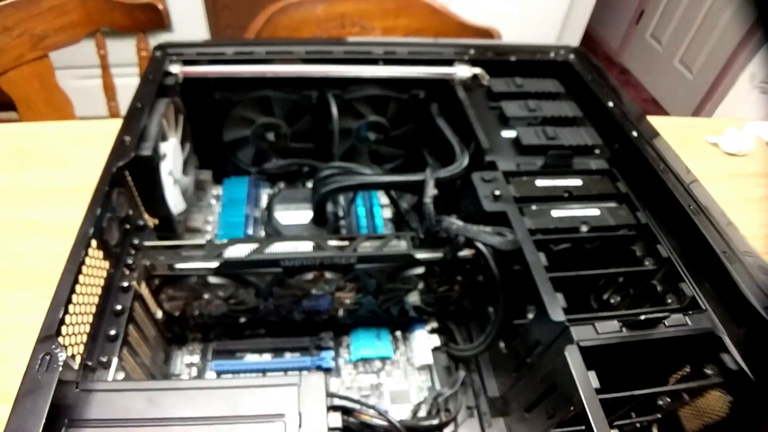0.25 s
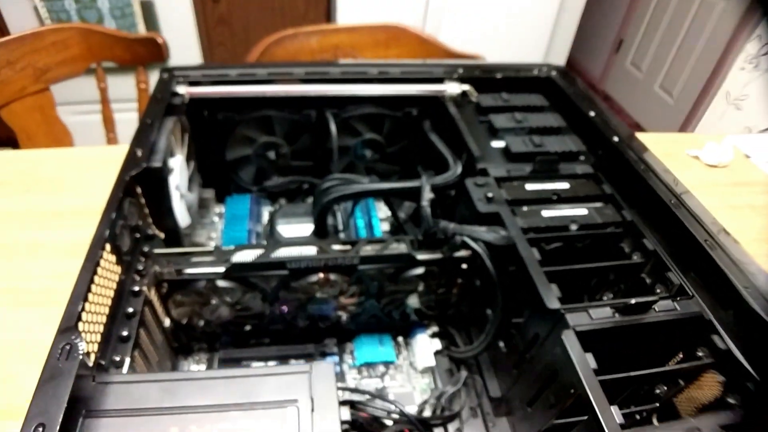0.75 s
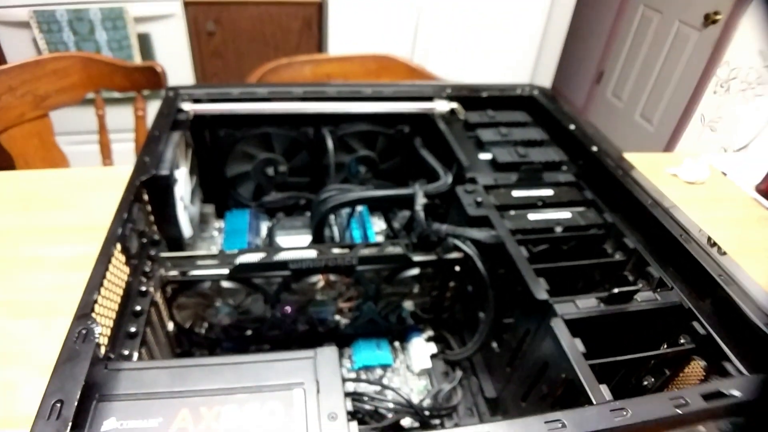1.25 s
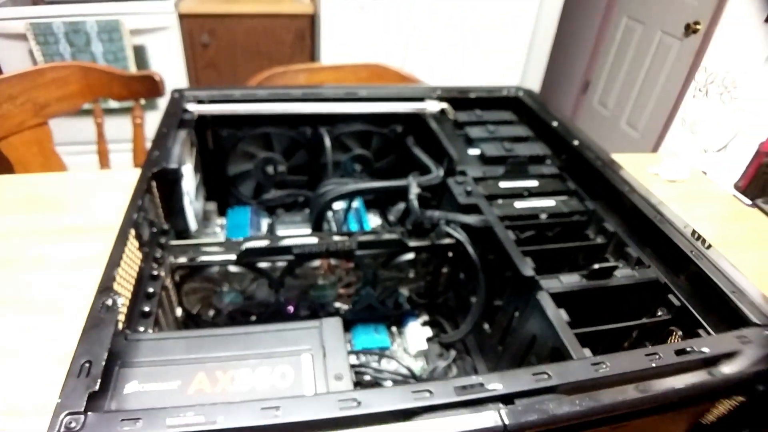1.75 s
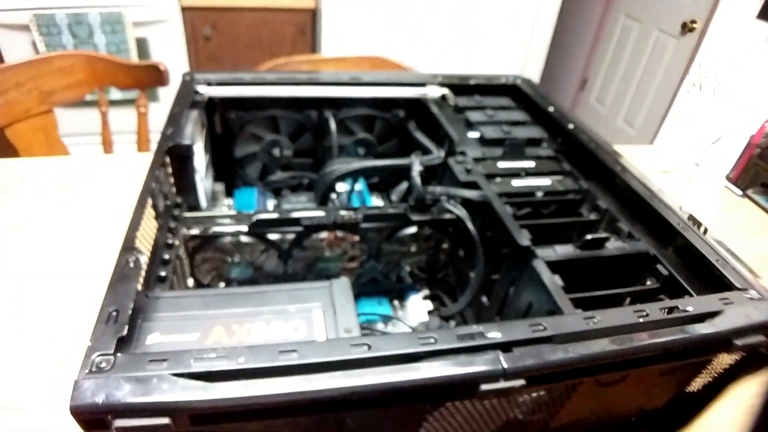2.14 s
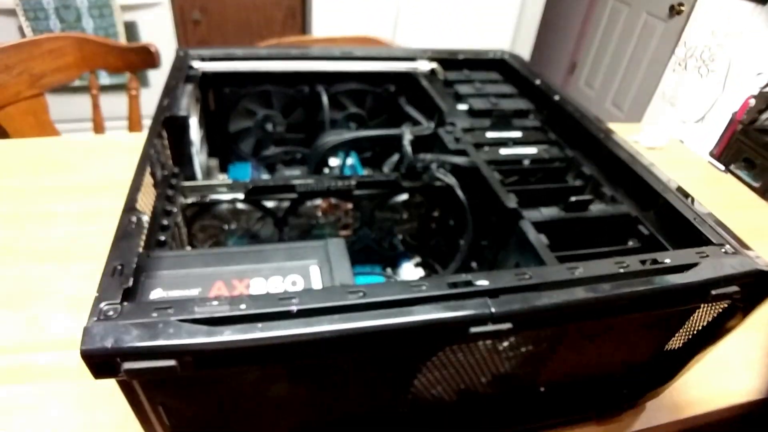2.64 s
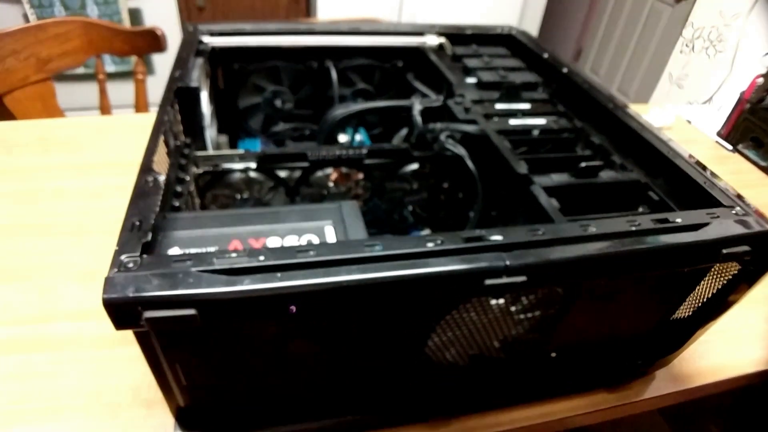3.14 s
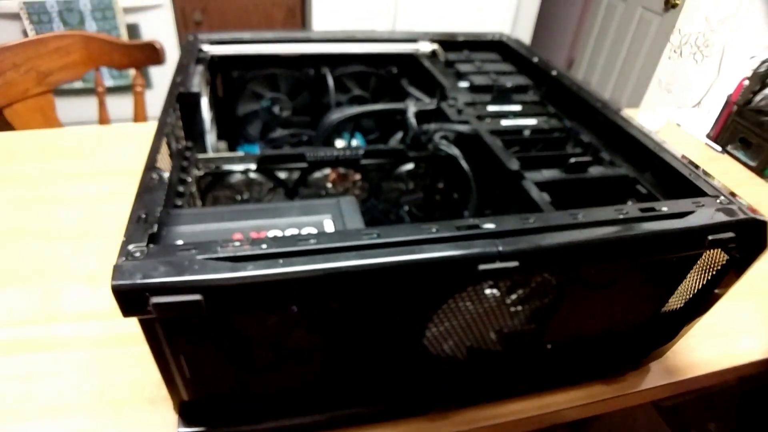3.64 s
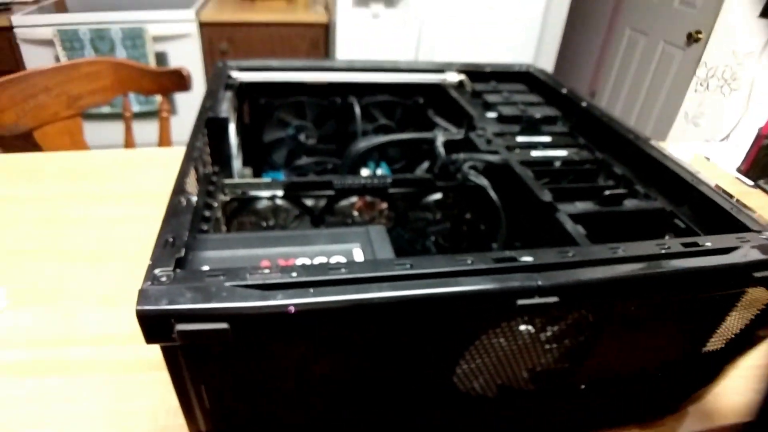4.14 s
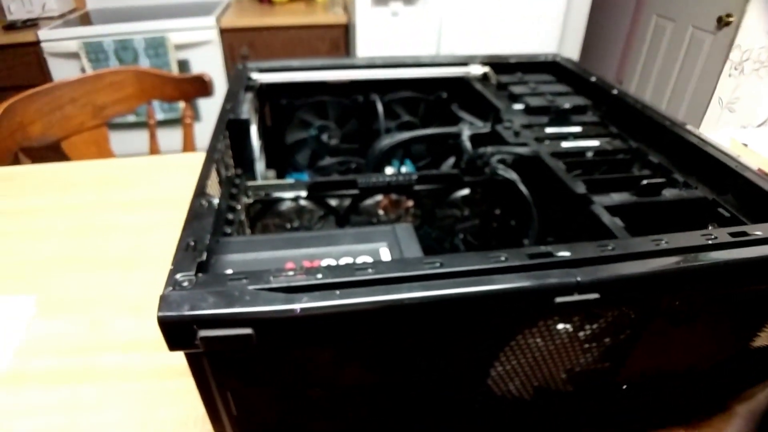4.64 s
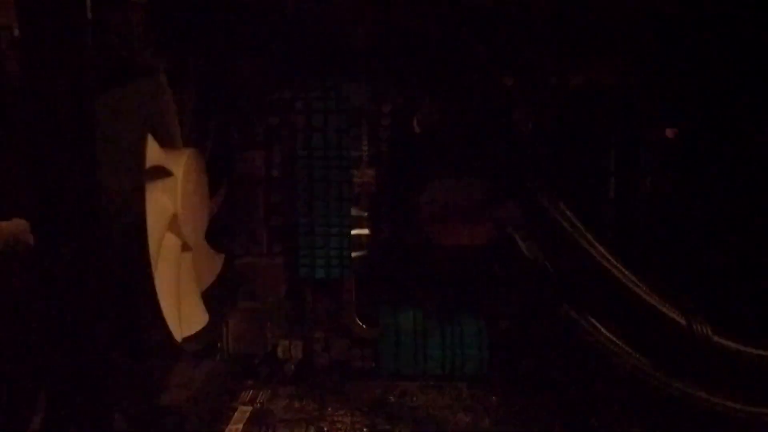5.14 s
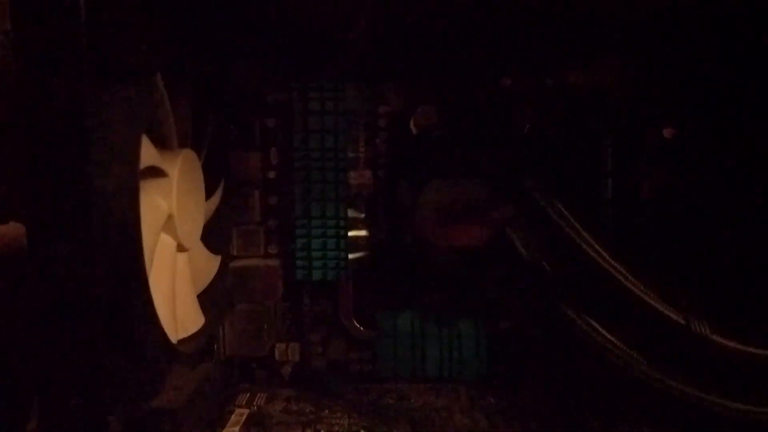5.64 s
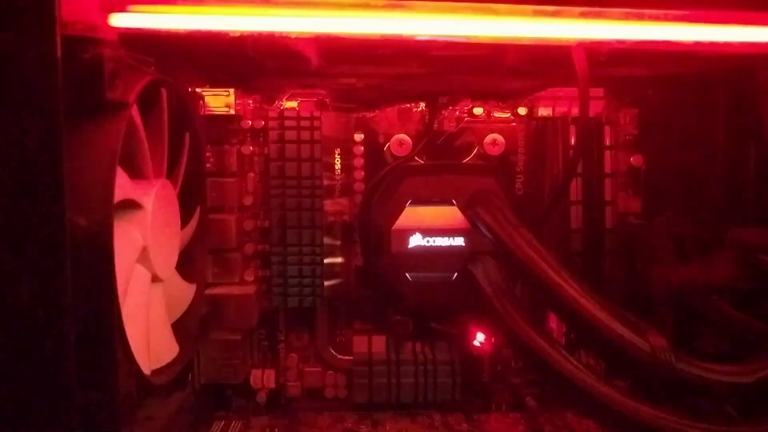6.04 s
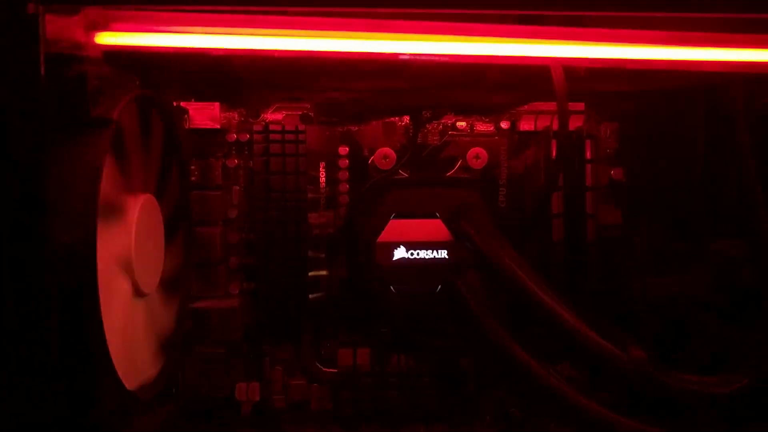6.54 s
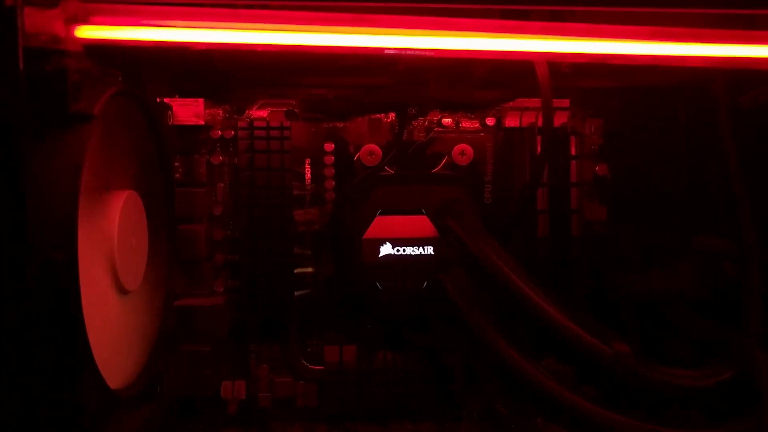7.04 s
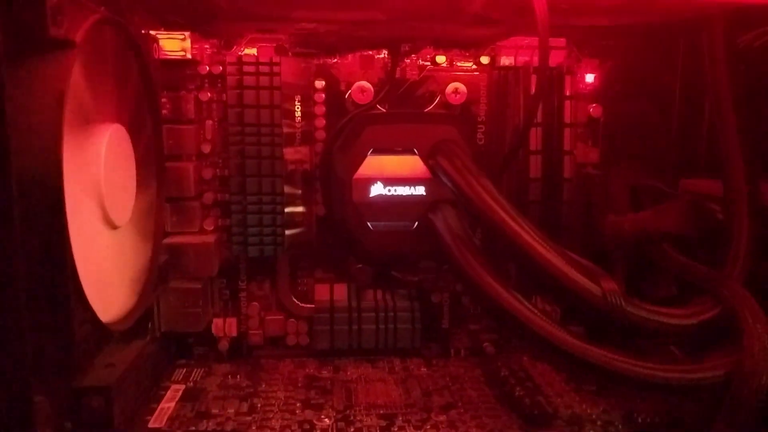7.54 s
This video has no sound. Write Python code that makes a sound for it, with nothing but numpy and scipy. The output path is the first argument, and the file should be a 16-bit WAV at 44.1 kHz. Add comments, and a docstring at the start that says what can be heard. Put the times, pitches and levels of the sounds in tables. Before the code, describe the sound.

Low computer hum with handling bumps and rubs, a faint electronic whine, a switch click and fans gathering speed.

```python
"""An open computer starts up

A desktop computer hums and blows air, while a hand thumps and rubs the phone that listens to it.
At 4.75 s the sound jumps to inside the case, where the electronic coils whine.
A power switch clicks down and up, and the fans gather speed.
Near the end the bass drops away and leaves a thin whine."""
import sys
import numpy as np
from scipy import signal
from scipy.fft import rfft, irfft, next_fast_len
from scipy.io import wavfile
from scipy.ndimage import uniform_filter1d

SR = 44100
rng = np.random.default_rng(int(sys.argv[2]) if len(sys.argv) > 2 else 0)


def waveform_to_disk(signal):
    """Save audio, clipped to [-1, 1], as 16-bit WAV at the path in sys.argv[1]."""
    frames = np.transpose(np.atleast_2d(signal))
    scaled = np.clip(frames, -1, 1) * 32767
    samples = np.round(scaled).astype(np.int16)
    wavfile.write(sys.argv[1], SR, samples)


N = 343098
T = np.arange(N) / SR


def undb(db):
    """Turn decibels into a number to multiply a sound by."""
    return 10 ** (np.asarray(db) / 20)


def wander(rate):
    """A smooth random drift of about 1 either way, with `rate` new values a second."""
    steps = np.arange(int(N / SR * rate) + 2)
    path = np.interp(T * rate, steps, rng.standard_normal(len(steps)))
    return 1.293 * uniform_filter1d(path, max(int(SR / rate), 2))


def noise(gain, size=N):
    """Noise of average (rms) strength 1; gain(f) sets the share of each frequency."""
    n = next_fast_len(size)
    hz = np.maximum(np.arange(n // 2 + 1) * SR / n, 1)
    x = irfft(rfft(rng.standard_normal(n)) * gain(hz), n)[:size]
    return x / x.std()


def coloured(points, size=N):
    """Noise whose colour, its balance of low and high, follows (f/Hz, level/dB) points."""
    hz, db = np.transpose(points)
    return noise(lambda f: undb(np.interp(np.log(f), np.log(hz), db)), size)


def ringing_noise(hz, width, size=N):
    """Noise gathered around one pitch."""
    return noise(lambda f: 1 / (1 + 2 * ((f * f - hz * hz) / (2 * f * width)) ** 2), size)


def tone(hz):
    """A pure tone of average (rms) strength 1 on a moving pitch."""
    return np.sqrt(2) * np.sin(2 * np.pi * (np.cumsum(hz) / SR + rng.random()))


def swell(t, rise, decay):
    """Grow softly up to t = 0, then die away."""
    return np.exp(-(np.minimum(t, 0) / rise) ** 2 - np.maximum(t, 0) / decay)


def fade_in(at_s, length_s):
    """A straight fade from 0 to 1, halfway at at_s."""
    return np.clip((T - at_s) / length_s + .5, 0, 1)


def add(out, s, x):
    """Mix x into out, starting at s seconds."""
    i = int(s * SR)
    out[i:i + len(x)] += x[:N - i]


# Colour of the moving air, outside and inside the case: f/Hz, level/dB
AIR_OUTSIDE = [(150, -15.5), (300, -7), (430, -6.5), (520, -11.5), (690, -17.5), (830, -11), (1020, -13.5),
               (1190, -10.5), (1850, -13), (3200, -20), (4100, -20.5), (6500, -26), (11600, -24),
               (15500, -29.5)]
AIR_INSIDE = [(150, 4), (280, -0.5), (440, -4), (610, -2), (740, -7.5), (950, -7), (1200, -6), (1450, -9),
              (1800, -5.5), (2800, -12.5), (4500, -13.5), (7000, -17.5), (11000, -19.5), (15500, -23)]
def air(inside):
    """Moving air makes a soft, slightly wavering rush."""
    outer = coloured(AIR_OUTSIDE) * undb(-62 + .5 * wander(3.94))
    inner = coloured(AIR_INSIDE) * undb(-57 + .5 * wander(3.98))
    return (1 - inside) * outer + inside * inner


# Colour of the hand's rumble: f/Hz, level/dB
RUMBLE_COLOUR = [(5, -16), (10, 12), (18, -14), (26, 10), (32, -2), (40, -12), (65, -8.5), (88, -15),
                 (135, -12.5), (175, -27.5), (280, -32), (500, -59)]
def hand_rumble():
    """The held phone rumbles, less and less as the hand settles."""
    settle_db_per_s = 1.15
    return coloured(RUMBLE_COLOUR) * undb(-39.5 - settle_db_per_s * T + .6 * wander(3))


# Tones of the hum: f/Hz, level outside/dB, level inside/dB, waver/dB
HUM_TONES = [(122.3, -44.5, -44.5, 1), (175, -88, -70, 2.5), (200.5, -61, -60.5, 1.2),
             (239.9, -66, -88, 3.1), (318, -72.5, -79, 0.5), (359.4, -71.5, -84.5, 2.2),
             (400.8, -71.5, -81.5, 1.5), (1363, -80, -77, 2.5), (1754, -88, -77, 0), (2140, -87, -103, 2),
             (2756, -84, -96, 0.5)]
def hum(inside):
    """Motors and mains power hum; the higher tones waver more in pitch."""
    out = np.zeros(N)
    for hz, out_db, in_db, waver_db in HUM_TONES:
        line = tone(hz + (.36 + hz / 350) * wander(14))
        out += line * undb(out_db + (in_db - out_db) * inside + waver_db * wander(9))
    return out


# Tiny squeaks of the grip: t/s, level/dB
GRIP_SQUEAKS = [(2.5546, -48.5), (2.716, -46.5), (2.788, -47), (2.917, -52)]
def squeaks():
    """Skin slips and tightens: a knock, then a tiny rising chirp."""
    out, t = np.zeros(N), np.arange(SR // 10) / SR
    rising_hz = 4250 - 2400 * np.exp(-t / .0024)
    knock = undb(-2.5) * np.exp(-t / .0032) * np.sin(2 * np.pi * 820 * t)
    for s, db in GRIP_SQUEAKS:
        shaky_hz = rising_hz * (1 + .058 * ringing_noise(400, 600, len(t)))
        chirp = np.sin(2 * np.pi * np.cumsum(shaky_hz) / SR)
        add(out, s, undb(db) * (swell(t - .002, rise=.0023, decay=.003) * chirp + knock))
    return out


# Colour of a rub heard through the phone's shell: f/Hz, level/dB
SHELL_COLOUR = [(300, 15), (800, -8), (2500, 6), (4000, 3), (6000, 3.5), (7000, 6.5), (8200, 1.5),
                (9800, 2), (12000, -2), (15500, -5.5)]
# Finger rubs: peak t/s, decay/s, scrape level/dB, scrape f/Hz, half width/Hz, hiss level/dB
FINGER_RUBS = [(.922, 0.024, -53, 600, 1110, -56), (1.636, .0025, -48, 9700, 1000, -45.5),
               (1.645, .0018, -47, 3900, 800, -43), (1.652, 0.028, -56.5, 1230, 130, -49),
               (1.888, 0.025, -64, 7000, 600, -55), (2.024, .007, -60, 3700, 1100, -78),
               (2.065, .004, -60, 3260, 1100, -78), (2.254, .0012, -57, 9000, 5000, -56),
               (3.896, 0.0068, -41, 1400, 1300, -50.5), (3.913, .014, -44, 1550, 1200, -53),
               (3.933, .008, -48, 1450, 1200, -54.5), (5.012, 0.0067, -53, 1500, 1600, -51),
               (5.254, .004, -52.5, 2000, 2000, -51.5), (5.9, 0.014, -55, 1790, 1500, -67),
               (6.575, .012, -59, 2500, 2400, -52), (6.594, 0.028, -50.5, 750, 1100, -64)]
def rubs():
    """Skin sticks and slips on the shell: a scrape with a thin hiss on top."""
    lead_s = .1  # room to swell before the peak
    out, t = np.zeros(N), np.arange(SR // 2) / SR - lead_s
    for s, decay, scrape_db, hz, width, hiss_db in FINGER_RUBS:
        scrape = noise(lambda f: 1 / (1 + 2 * ((f - hz) / width) ** 4) * f / (f + 200), len(t))
        slips = undb(1.7 * ringing_noise(140, 200, len(t)) - 1.9)
        contact = swell(t, .84 * decay, decay) * slips
        hiss = coloured(SHELL_COLOUR, len(t))
        add(out, s - lead_s, contact * (undb(scrape_db) * scrape + undb(hiss_db) * hiss))
    return out


# Sharp taps on the phone and the case: t/s, f/Hz, level/dB
SHELL_TAPS = [(.903, 800, -37.5), (3.8829, 444, -28.5), (3.8917, 1320, -20), (5.0065, 510, -30.5),
              (5.0117, 338, -27.5), (6.571, 487, -21.5), (6.5732, 184, -24.5)]
def taps():
    """A quick push makes the shell swing once or twice."""
    out, t = np.zeros(N), np.arange(SR // 10) / SR
    decay_cycles = .64
    attack = (1 - np.exp(-t / .00009)) ** 2
    for s, hz, db in SHELL_TAPS:
        swing = np.exp(-t * hz / decay_cycles) * np.cos(2 * np.pi * hz * t - .6)
        add(out, s, undb(db) * attack * swing)
    return out


# Colour of the rumble after a thump: f/Hz, level/dB
THUD_COLOUR = [(12, -2), (25, 6.5), (55, 4.5), (100, -1.5), (170, -7.5), (230, -35), (500, -44.5),
               (2000, -83)]
# Soft thumps through the phone: peak t/s, f/Hz, push level/dB, rumble level/dB
GRIP_THUMPS = [(1.507, 95.6, -18.5, -28.5), (1.663, 116, -12.5, -25.5), (1.823, 116, -30, -51),
               (1.898, 115.6, -17, -30), (2.236, 83, -24, -39), (2.275, 109, -15, -32),
               (2.546, 24, -28, -42), (2.988, 113, -20, -27), (3.771, 60.4, -32, -44), (4.37, 52, -25, -35),
               (4.511, 27, -32.5, -46), (5.281, 58.3, -24, -34.5), (5.322, 69, -29.5, -45),
               (7.143, 53.5, -28, -50)]
def thumps():
    """A shifting grip rocks the phone and leaves a short rumble; lower thumps are slower."""
    lead_s = .1
    out, t = np.zeros(N), np.arange(SR // 2) / SR - lead_s
    for s, hz, push_db, rumble_db in GRIP_THUMPS:
        push = swell(t, rise=1 / hz, decay=1.36 / hz) * np.cos(2 * np.pi * hz * t)
        rumble = swell(t - .012, rise=.019, decay=.045) * coloured(THUD_COLOUR, len(t))
        add(out, s - lead_s, undb(push_db) * push + undb(rumble_db) * rumble)
    return out


# Thin tones of the coils: f/Hz, level/dB
COIL_TONES = [(3268.5, -69), (3815, -89), (5506, -78), (6535, -83), (7289, -95), (7391, -90), (7490, -90),
              (8126, -86), (8230, -81.5), (8543, -82), (8867, -75.5), (9507, -96), (9609, -97),
              (10245, -82)]
# Bands where the coils sizzle: f/Hz, width/Hz, level/dB, change during the surge/dB
SIZZLE_BANDS = [(3166, 330, -73, 2), (3780, 680, -71, -5.5), (5610, 1000, -72.5, 5), (8260, 2150, -70.5, 1),
                (10100, 1200, -80.5, 4)]
def coils():
    """Coils whine and sizzle with their electrical load: a surge, then standby, then easy running."""
    surge = 1 - fade_in(at_s=5.04, length_s=.05)
    running = fade_in(at_s=6.6, length_s=.18)
    standby = 1 - surge - running
    load_db = 7.5 * surge + 3 * standby - 1.5 * running
    loudest_db = max(db for _, db in COIL_TONES)
    whine, sizzle = np.zeros(N), np.zeros(N)
    for hz, db in COIL_TONES:
        share = 1 if db == loudest_db else .25  # weaker tones follow the load less
        whine += tone(hz + 2.4 * wander(60)) * undb(db + share * load_db + 1.5 * wander(15))
    # Random peaks make the noise sound like a crowd of faint switching tones.
    peak_hz = np.arange(0, SR / 2, 30)
    peaks = undb(4.7 * rng.standard_normal(len(peak_hz)))
    for hz, width, db, surge_db in SIZZLE_BANDS:
        band = noise(lambda f: np.interp(f, peak_hz, peaks) / (1 + (2 * (f - hz) / width) ** 6))
        sizzle += band * undb(db + surge * surge_db)
    return whine + sizzle * undb(.2 * load_db)


# Very high tones of the power supply: f/Hz, level/dB
SUPPLY_TONES = [(13485, -90), (14115, -83), (14734, -79), (15353, -75)]
def supply_squeal():
    """The power supply squeals briefly as it takes the load."""
    squeal = sum(tone(hz + 20 * wander(200)) * undb(db) for hz, db in SUPPLY_TONES)
    sounding = fade_in(at_s=6.55, length_s=.02) - fade_in(at_s=6.73, length_s=.02)
    return undb(-2) * squeal * sounding


# Colour of the switch's snap: f/Hz, level/dB
SNAP_COLOUR = [(500, -3), (2000, -10), (4000, -2), (6500, -4), (9000, -8), (12000, -0.5), (15000, 2)]
# Pitches at which the front panel rings: f/Hz, width/Hz, level/dB
PANEL_RINGS = [(750, 1500, -9.5), (1550, 530, -6.5), (2320, 220, -8.5), (2780, 280, -6.5), (3700, 670, -7)]
# The switch pressed and let go: t/s, snap level/dB, snap decay/s, spring level/dB, panel level/dB
SWITCH_CLICKS = [(5.9847, -33.5, 0.0032, -37, -51.5), (6.0711, -42, 0.0029, -46, -59),
                 (6.0878, -34.5, 0.0061, -52, -41)]
def power_switch():
    """The switch snaps, its spring rings, and the front panel gives a duller answer."""
    out, t = np.zeros(N), np.arange(SR // 4) / SR
    spring_hz, panel_delay_s = 5150, .017
    spring = np.sqrt(2) * np.sin(2 * np.pi * spring_hz * t) * np.exp(-t / .0043)
    snap_tail = undb(-19) * np.exp(-t / .025)
    answer = swell(t - panel_delay_s, rise=.016, decay=.014)
    for s, snap_db, decay, spring_db, panel_db in SWITCH_CLICKS:
        snap = coloured(SNAP_COLOUR, len(t)) * (np.exp(-t / decay) + snap_tail)
        panel = sum(ringing_noise(hz, width, len(t)) * undb(db) for hz, width, db in PANEL_RINGS)
        add(out, s, undb(snap_db) * snap + undb(spring_db) * spring + undb(panel_db) * panel * answer)
    return out


def run_up(start_s, lag_s):
    """A motor's share of full speed: it climbs quickly at first, then levels off."""
    return np.maximum(1 - np.exp(-np.maximum(T - start_s, 0) / lag_s), 1e-3)


def small_fan():
    """A small, fast fan's motor sings faint rising tones, loudest while it pulls hardest."""
    full_speed_hz, frame_hz = 1250, 5000
    motor_hz = full_speed_hz * run_up(start_s=6.76, lag_s=.52)
    song = np.zeros(N)
    for multiple in range(6, 19):
        hz = multiple * motor_hz
        flare = 1 + undb(5) / (1 + ((hz - frame_hz) / 450) ** 2)  # louder where the fan's frame rings
        song += tone(hz) * flare
    pull = swell(T - 7.41, rise=.13, decay=.22)
    return undb(-80) * song * pull


# Pitches at which the case rings: f/Hz, width/Hz, level/dB
CASE_RINGS = [(205, 67, -2), (326, 60, -2.5), (615, 43, 0), (905, 110, 0.5), (1200, 200, 1),
              (1600, 110, -3), (1760, 70, -2)]
def case_gain(hz):
    """The open case passes a tone best near its own ringing pitches."""
    return undb(-20) + sum(undb(db) / (1 + (2 * (hz - f) / width) ** 2) for f, width, db in CASE_RINGS)


# Tones of the fan blades: multiple of the rate at which blades pass, level/dB
FAN_TONES = [(1, -50), (2, -68), (4, -72), (5, -72), (6, -74), (7, -67.5), (9, -66.5), (11, -70)]
# Colour of the air the fans push: f/Hz, level/dB
RUSH_COLOUR = [(70, -12.5), (170, 10.5), (300, -1.5), (600, -8.5), (1200, -21), (2500, -25), (6000, -27),
               (12000, -29), (15300, -23)]
def fans():
    """Blades chop the air into rising tones and a rush, both growing louder with speed."""
    full_speed_hz, db_per_tenfold_speed = 205.5, 46
    speed = run_up(start_s=6.292, lag_s=.68)
    blades = np.zeros(N)
    for multiple, db in FAN_TONES:
        hz = multiple * full_speed_hz * speed
        blades += tone(hz * (1 + .004 * wander(70))) * case_gain(hz) * undb(db + 2.2 * wander(16))
    rush = coloured(RUSH_COLOUR) * undb(-56.5 + 1.1 * wander(7.8))
    return (blades + rush) * undb(2.5 + db_per_tenfold_speed * np.log10(speed))


def scene():
    """Mix everything into one channel; the coils and starting fans are heard only inside the case."""
    inside = fade_in(at_s=4.749, length_s=.018)  # 0 outside the case, 1 inside
    background = hum(inside) + air(inside) + hand_rumble()
    machine = coils() + supply_squeal() + fans() + small_fan()
    handling = thumps() + taps() + rubs() + squeaks()
    return (background + inside * machine + handling + power_switch())[None]


def record(dry):
    """Near the end the bass drops to a faint murmur; the highest treble is cut throughout."""
    bass_hz, top_hz = 165, 15850
    thin = signal.sosfilt(signal.butter(10, bass_hz, "high", fs=SR, output="sos"), dry)
    bass_gone = fade_in(at_s=7.156, length_s=.0042)
    murmur = undb(-67.5) * coloured([(30, -25), (55, -28), (80, 4), (130, -8), (200, -16), (400, -60)])
    mix = dry * (1 - bass_gone) + (thin + murmur) * bass_gone
    return signal.sosfilt(signal.ellip(10, .2, 80, top_hz, fs=SR, output="sos"), mix)


dry = scene()
out = record(dry)
waveform_to_disk(out)
```